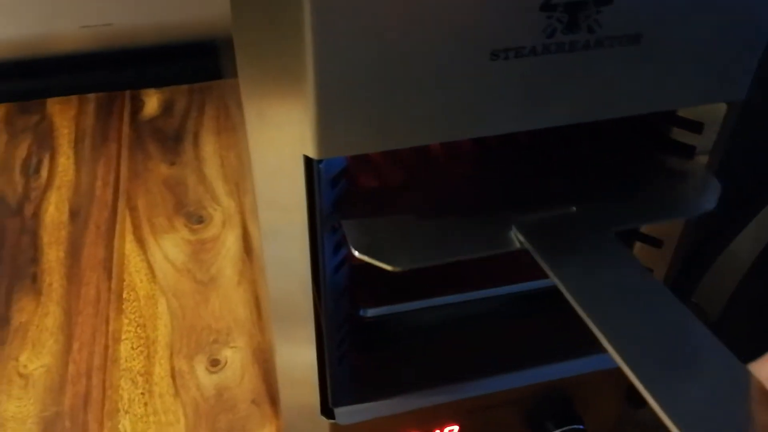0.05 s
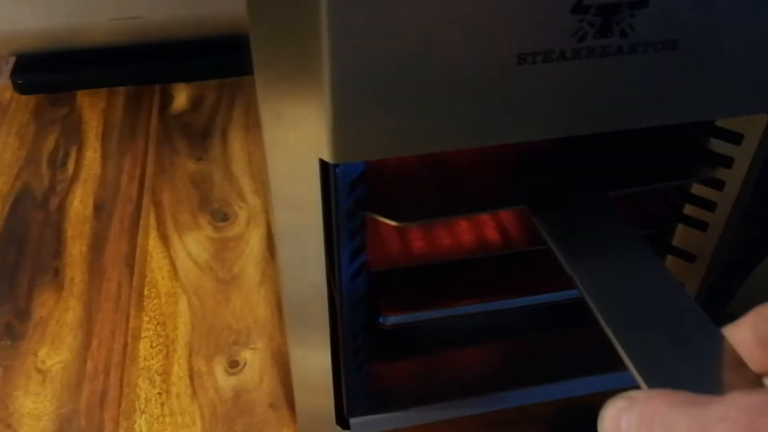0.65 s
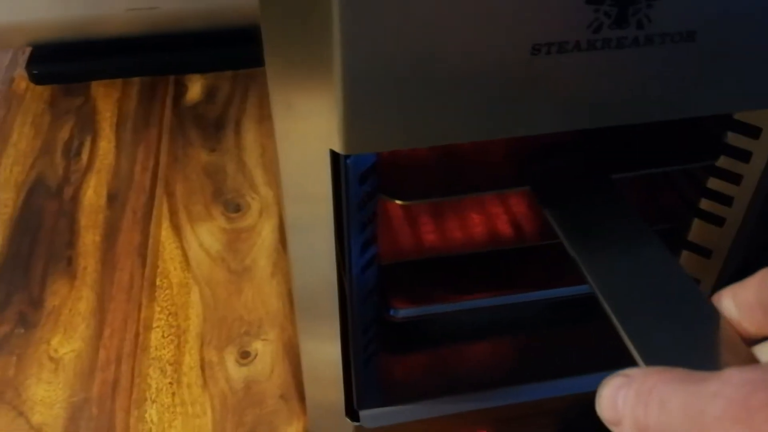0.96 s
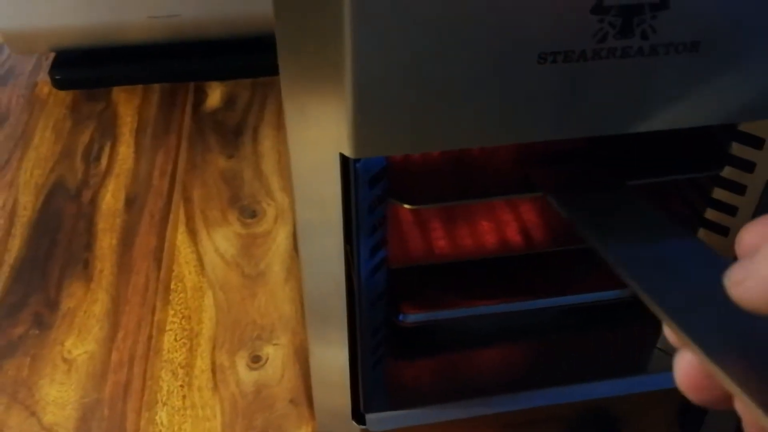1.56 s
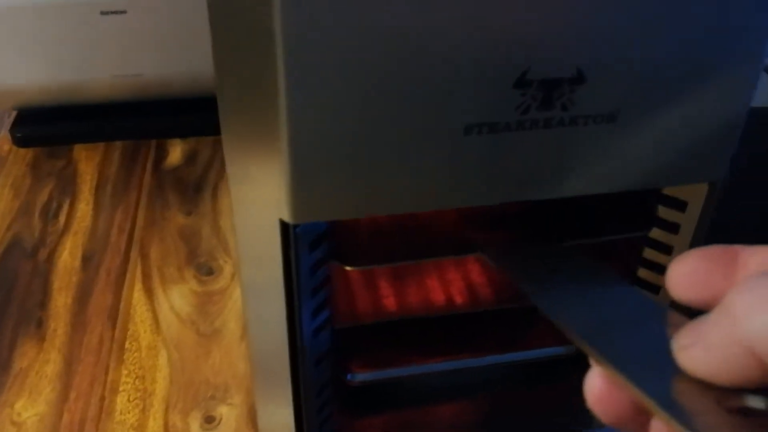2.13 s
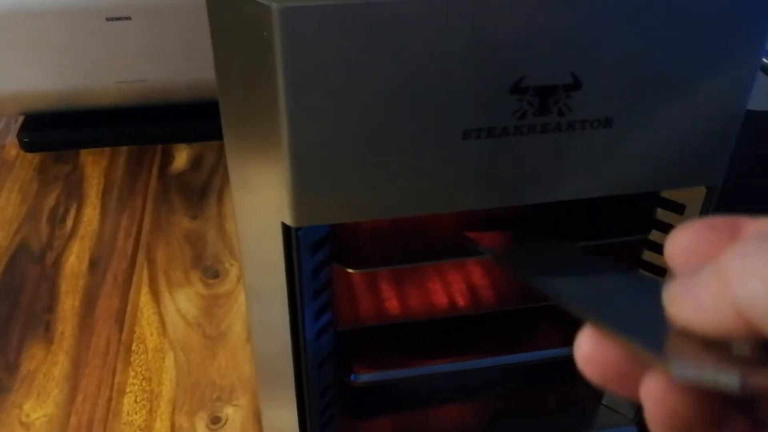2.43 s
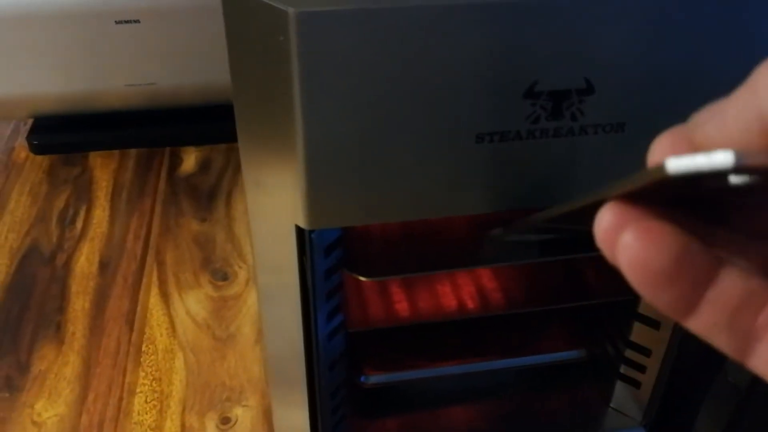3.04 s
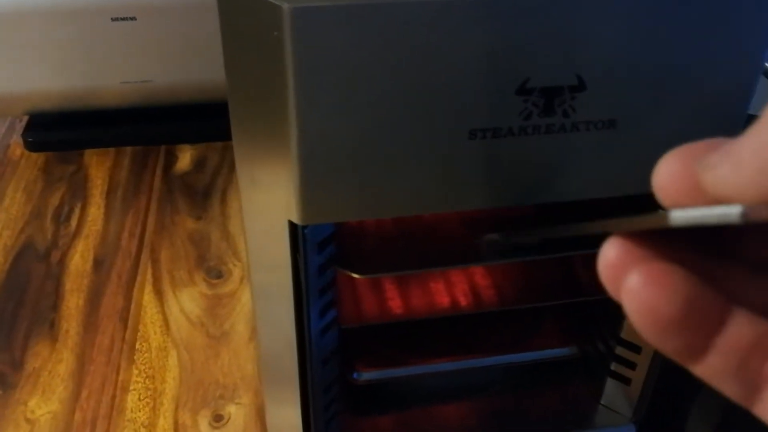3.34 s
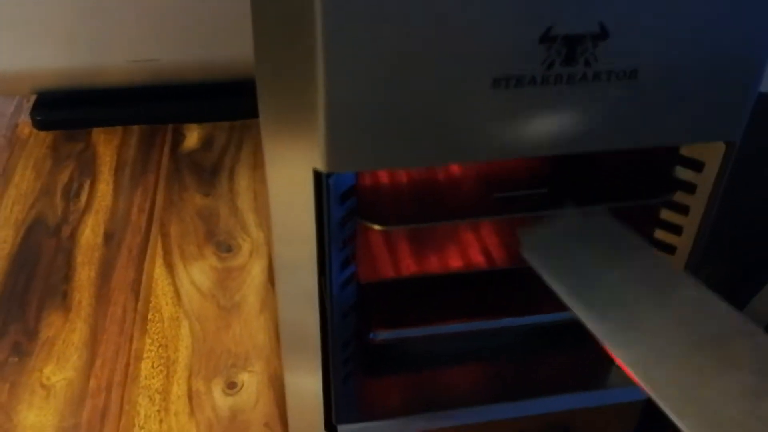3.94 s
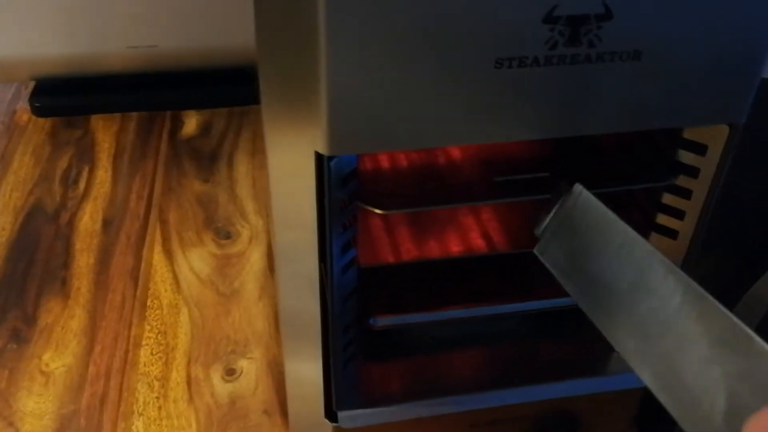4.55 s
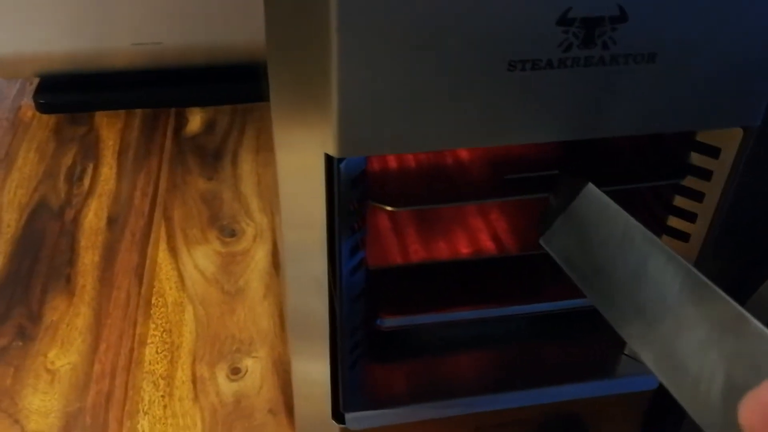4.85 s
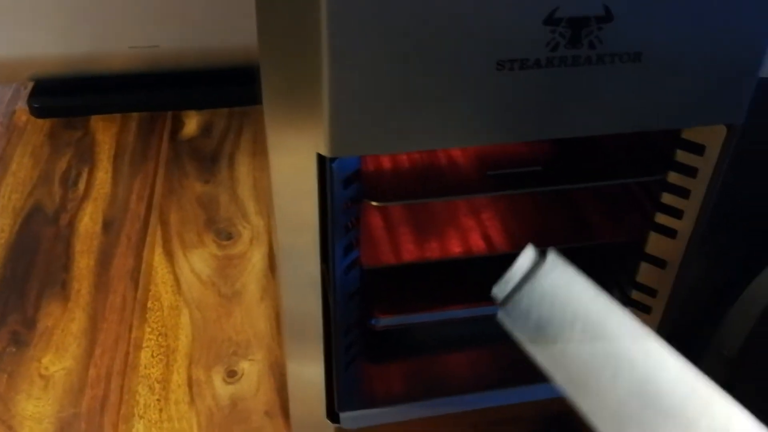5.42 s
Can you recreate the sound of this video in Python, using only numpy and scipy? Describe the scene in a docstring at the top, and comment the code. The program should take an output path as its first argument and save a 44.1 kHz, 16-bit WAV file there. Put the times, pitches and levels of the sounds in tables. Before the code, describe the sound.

Ringing metal clanks from a grill rack, then light steel scrapes and clicks, then more sharp clanks in a quiet kitchen.

```python
"""Small kitchen, electric grill on the counter. A steel rack slides in and clanks against the
sheet-steel housing: each blow gives a crash, ringing rack modes and a hollow boom.
The flat steel handle ticks, scrapes out of the rack in uneven slips and knocks on the grill again.
Faint fan noise and mains hum lie underneath; the room adds a short reverb."""
import sys
import numpy as np
from scipy import signal
from scipy.fft import rfft, irfft, next_fast_len
from scipy.io import wavfile
from scipy.ndimage import map_coordinates

SR = 44100
rng = np.random.default_rng(int(sys.argv[2]) if len(sys.argv) > 2 else 0)


def store_wav(level_fs):
    """Save 16-bit WAV to argv[1]."""
    pcm = np.round(np.clip(np.atleast_2d(level_fs), -1, 1) * 32767)
    wavfile.write(sys.argv[1], SR, pcm.T.astype(np.int16))


N = 250488
T = np.arange(SR) / SR  # time since contact [s]
PING_HZ = 4750  # near the handle's clearest mode, which also squeaks under friction

# handle modes: (frequency [Hz], level [dB], free t60 [s], twist share [0-1])
HANDLE_MODES = [(1584, -4.5, 0.11, 1), (2377, -2, 0.1, 0.17), (3445, 1.5, 0.061, 0.086),
                (4110, -4.5, 0.055, 0.8), (4710, 1, 0.38, 0.24), (5780, -2, 0.11, 0.43),
                (6240, 3, 0.1, 0.18), (7020, -3.5, 0.071, 1), (8030, 0, 0.25, 0.4), (8650, -2.5, 0.37, 1),
                (9900, -7, 0.25, 0.2), (9920, 3, 0.22, 0.95), (11900, 1.5, 0.15, 1),
                (12230, -28, .18, 0.27), (14150, -19, .12, 0.92)]
# room decay: (frequency [Hz], t60 [s])
ROOM_T60 = [(150, 0.66), (700, 0.64), (2000, 0.6), (6000, 0.55), (10000, 0.4), (15000, 0.17)]
# direct sound: (frequency [Hz], L/R correlation [0-1])
DIRECT_CORR = [(200, 1), (1200, 0.88), (2200, 0.64), (4000, 0.0019), (9000, 0.13)]
# diffuse sound: (frequency [Hz], L/R correlation [0-1])
DIFFUSE_CORR = [(150, 1), (400, 0), (1100, 0), (2500, 0.0066), (9000, 0)]


def amp(db):
    """dB to gain."""
    return 10 ** (np.asarray(db) / 20)


def unit(x):
    """Scale to rms 1."""
    return x / np.sqrt(np.mean(x ** 2) + 1e-20)


def along(points, hz):
    """Interpolate (frequency [Hz], value) points on a log axis."""
    f, v = np.transpose(points)
    return np.interp(np.log(hz + 1), np.log(f + 1), v)


def pan(db):
    """Stereo gains for a left-minus-right level."""
    return amp(np.array([[.5], [-.5]]) * db)


def wobble(rate_hz):
    """Smooth random curve with knots at rate_hz."""
    knots = rng.standard_normal(int(N * rate_hz / SR) + 4)
    return map_coordinates(knots, [np.arange(N) * rate_hz / SR])


def filtered(x, response):
    """Apply the gain response(hz) by FFT."""
    n = x.shape[-1]
    m = next_fast_len(n + 8192)
    return irfft(rfft(x, m) * response(np.fft.rfftfreq(m, 1 / SR)), m)[..., :n]


def tilt(hz, db_oct):
    """Spectral slope about 3 kHz: harder contact, more treble."""
    return amp(db_oct * np.log2(np.clip(hz, 800, 16000) / 3000))


def resonances(hz, db, width_hz, valley_db):
    """Body response: a peak at each mode over a flat floor."""
    grid_hz = np.linspace(0, SR / 2, num=4096)
    power = amp(db) ** 2 @ (1 / (1 + ((grid_hz - hz[:, None]) * 2 / width_hz) ** 2))
    return lambda f: np.interp(f, grid_hz, np.sqrt(power + amp(valley_db) ** 2))


def noise(spectrum, corr, size, db_oct=0, body=np.ones_like):
    """Stereo noise, rms 1, with given spectrum, L/R correlation, tilt and body response."""
    def colour(hz):
        angle = np.arccos(np.clip(along(corr, hz), -1, 1)) / 2
        return amp(along(spectrum, hz)) * tilt(hz, db_oct) * body(hz) * [np.cos(angle), np.sin(angle)]
    mid, side = filtered(rng.standard_normal((2, size)), colour)
    return unit(np.array([mid + side, mid - side]))


def rise(attack_s):
    """Exponential onset."""
    return 1 - np.exp(-T / attack_s)


def fade(t60_s, attack_s):
    """Onset and exponential decay."""
    return np.exp(-np.log(1000) * T / t60_s) * rise(attack_s)


def band_decay(x, t60_curve):
    """Decay each band by (frequency [Hz], t60 [s]) points."""
    hz, t, bands = signal.stft(x, SR, nperseg=256)
    decay = np.exp(-np.log(1000) * t / along(t60_curve, hz)[:, None])
    return signal.istft(bands * decay, SR, nperseg=256)[1][:, :SR]


def ring(hz, db, t60_s, scatter_db):
    """Decaying modes, initial rms 1; L/R phase spread grows with frequency."""
    gain = amp(db + scatter_db * rng.standard_normal((2, len(hz))))
    gain /= np.sqrt(np.sum(gain ** 2) / 4)
    phase = 2 * np.pi * rng.random(len(hz)) + hz / 2200 * rng.standard_normal(gain.shape)
    poles = 2j * np.pi * hz - np.log(1000) / t60_s
    return ((gain * np.exp(1j * phase)) @ np.exp(poles[:, None] * T)).imag


def add(track, start_s, sound):
    """Mix in up to 1 s of sound."""
    part = track[:, round(start_s * SR):][:, :SR]
    part += sound[:, :part.shape[1]]


def fan():
    """Moving air plus slightly unsteady motor and mains tones."""
    # air noise: (frequency [Hz], level [dB])
    air_spectrum = [(20, -15), (80, -12.5), (150, -3.5), (260, 0.5), (350, -4.5), (490, -13.5), (660, -5),
                    (880, -9.5), (1100, 1), (1500, -1.5), (2100, -8.5), (4000, -16), (9500, -23.5),
                    (15000, -35.5)]
    # air width: (frequency [Hz], L/R correlation [0-1])
    air_corr = [(60, 0.89), (180, 1), (550, 0.17), (1650, 0.54), (4970, 0.014), (15000, 0.021)]
    # air balance: (frequency [Hz], L-R [dB])
    air_pan = [(60, -1), (180, -1.5), (550, 2), (1650, 2), (4970, -0.5), (15000, 5.5)]
    # mains and motor tones: (frequency [Hz], level [dB])
    tones = [(48.4, -71.5), (96.9, -73), (172.3, -68.5), (296.1, -72), (393.0, -78), (672.9, -73),
             (1044, -70), (1179, -70.5), (1523, -67.5)]
    t = np.arange(N) / SR
    air = filtered(noise(air_spectrum, air_corr, N), lambda hz: pan(along(air_pan, hz)))
    hum = sum(amp(db) * np.sqrt(2) * np.sin(2 * np.pi * hz * t + 0.0027 * hz * wobble(rate_hz=9))
              for hz, db in tones)
    return amp(-55.5 + 0.83 * wobble(rate_hz=4.97)) * air + amp(-1.0) * hum


def kitchen_reverb(x):
    """Diffuse room response: strong early bounces off counter and wall, faint tail."""
    early = 1 + amp(6) * np.exp(-T / 0.061)
    diffuse = noise([(100, -2), (15000, -4)], DIFFUSE_CORR, SR)
    impulse = band_decay(diffuse, ROOM_T60) * rise(0.0031) * early
    return signal.fftconvolve(x, impulse / np.linalg.norm(impulse[0]), axes=1)[:, :N]


def handle_scrape():
    """Uneven steel-on-steel slips drive the handle's modes, widened by contact damping."""
    # slides in the rack: (start [s], length [s], level [dB], tilt [dB/oct], ping boost [dB])
    strokes = [(1.969, 0.067, -63, -7, 9), (2.024, 0.045, -51.5, -6.5, 13), (2.258, 0.035, -70, -2, 12),
               (2.355, 0.05, -68, 3, 2), (3.154, 0.022, -53.5, -8, -8), (3.332, 0.043, -54.5, -2.5, -2),
               (3.377, 0.076, -43.5, 0.3, 6.5), (3.51, 0.05, -46, 2, -6)]
    # friction: (frequency [Hz], level [dB])
    friction = [(500, -19), (1500, 9), (2200, 8.5), (3000, -8.5), (4300, 4.0), (12000, -9.5),
                (15500, -27)]
    hz, mode_db = np.transpose(HANDLE_MODES)[:2]
    is_ping = np.abs(hz - PING_HZ) < 250
    grip_s, release_t60_s = 0.0041, 0.16
    out = np.zeros((2, N))
    for start_s, length_s, db, db_oct, ping_db in strokes:
        body = resonances(hz, mode_db + ping_db * is_ping, width_hz=51, valley_db=-19)
        envelope = rise(grip_s) * np.exp(-np.log(1000) * np.maximum(T - length_s, 0) / release_t60_s)
        add(out, start_s, amp(db) * envelope * noise(friction, DIRECT_CORR, SR, db_oct, body))
    slips = unit(amp(1.5 * wobble(rate_hz=400)))
    return slips * out * pan(0.67)


def handle_taps():
    """The handle hits the rack: a tick, then the strip rings, damped by grip and contact."""
    # contacts: (time [s], level [dB], tilt [dB/oct], ping boost [dB], twist [dB], tick [dB], L-R [dB])
    contacts = [(2.029, -48.5, -1, 12.5, -12, -6, -8.5), (3.152, -55, -8, -11, 3, -11, 15),
                (3.165, -45.5, -12, -14, -14, -15, 7), (3.432, -50.5, 3, 3, 2, -8, 15),
                (3.452, -46, 5, -7, -16, -19, 16), (3.482, -37, 2.5, 4, -12, -2, 2),
                (3.497, -39, 2, -3, 0, -4.5, 13), (4.8015, -34.5, -1, -14, -34, -15, 1),
                (4.813, -51.5, 5.5, -21, -7, 1, 7)]
    # contact noise: (frequency [Hz], level [dB])
    tick_spectrum = [(600, -18), (1500, 4), (3000, -2), (5000, -3), (10000, -6.5), (12200, -11),
                     (15500, -30)]
    hz, mode_db, t60_s, twist_share = np.transpose(HANDLE_MODES)
    is_ping = np.abs(hz - PING_HZ) < 250
    held_t60_s = 0.45 * t60_s
    out = np.zeros((2, N))
    for start_s, db, db_oct, ping_db, twist_db, tick_db, pan_db in contacts:
        # edge blows twist the strip; face blows only bend it
        struck_db = mode_db + twist_db * twist_share + ping_db * is_ping + db_oct * np.log2(hz / hz[0])
        strip = ring(hz, struck_db, held_t60_s, scatter_db=-0.1) * rise(0.00098)
        strip *= amp(max(ping_db, 0) / 2)
        tick = noise(tick_spectrum, DIRECT_CORR, SR, db_oct) * fade(t60_s=0.16, attack_s=0.00064)
        add(out, start_s, amp(db) * pan(pan_db) * (strip + amp(tick_db) * tick))
    return out


def rack_clanks():
    """Blows on rack and housing: crash through the steel's modes, ring, slower boom, room tail."""
    # blows: (time [s], level [dB], tilt [dB/oct], favoured frequency [Hz], boom [dB])
    blows = [(0.081, -40.5, -0.5, 3950, -16.5), (0.727, -53, -2.5, 8000, -18),
             (0.8724, -24.5, 0.1, 1000, -16.5), (0.889, -36, -9.5, 1320, -2), (4.803, -46, -2.5, 1750, -21),
             (4.964, -28, 0.15, 7600, -15), (5.0459, -22, 0.6, 6800, -14.5)]
    # rack and housing modes: (frequency [Hz], level [dB], free t60 [s])
    modes = [(216, 3, 0.51), (394.3, -16, 2.1), (840, -4.5, 0.79), (983, -2, 0.17), (1015.5, -1, 0.24),
             (1274, -4, 0.13), (1334, -1, 0.53), (1552, -0.5, 0.21), (1790, -1, 0.84), (2082, 1.5, 0.22),
             (2600, -2.5, .35), (2860, -2.5, 0.77), (3510, -3, 0.79), (3810, -6, 0.81), (3950, -3, 0.36),
             (4490, -4.5, 0.63), (4860, -2.5, 0.63), (5080, -14, 0.31), (5580, -5, 0.55), (6140, -2, 0.37),
             (6490, 2, 0.13), (6830, -7.5, 1), (7170, -18, .36), (7700, -2, 0.55), (8500, -10, .3),
             (9050, -21, .38), (9700, -2.5, 0.48), (10600, -10, 0.25)]
    # blow, direct: (frequency [Hz], level [dB])
    steel_spectrum = [(150, -24), (550, -11), (950, -4), (1400, -1), (2100, -2.5), (2500, -6.5),
                      (3300, -2.5), (4400, -0.5), (6500, -2), (10000, 0), (12500, -9), (15500, -26)]
    # blow, via the room: (frequency [Hz], level [dB])
    tail_spectrum = [(150, -12), (550, -4), (900, -5.5), (2100, -2), (3200, -3), (4500, -1.5), (6500, -6),
                     (10000, -6.5), (15000, -14)]
    # hollow housing: (frequency [Hz], level [dB])
    boom_spectrum = [(50, -29), (120, -8.5), (205, -1.5), (270, -7), (335, 6.5), (390, -4), (435, -14),
                     (490, -6.5), (560, -11), (800, -5.5), (2000, -47)]
    # grill balance: (frequency [Hz], L-R [dB])
    grill_pan = [(400, -3), (1100, 3.5), (2100, 7.5), (4000, -3), (7000, -6), (12000, 10.5)]
    crash_t60 = [(1000, 0.2), (2000, 0.27), (5000, 0.18), (12000, 0.076)]
    firm_db, firm_t60_share, loss_per_db = -26, 0.55, 0.14
    hz, mode_db, t60_s = np.transpose(modes)
    out = np.zeros((2, N))
    for start_s, db, db_oct, favoured_hz, boom_db in blows:
        # harder blows press the rack into its rails: shorter ring
        t60_share = np.clip(firm_t60_share - loss_per_db * (db - firm_db), .1, 1)
        # the contact point favours one group of modes
        favour_db = 4 * np.exp(-(np.log2(hz / favoured_hz) / 0.14) ** 2)
        struck_db = mode_db + favour_db + rng.standard_normal(len(hz))
        body = resonances(hz, struck_db, width_hz=38, valley_db=-12)
        crash = band_decay(noise(steel_spectrum, DIRECT_CORR, SR, db_oct, body), crash_t60)
        # near-identical bars split each mode into a beating pair
        pairs_hz = np.tile(hz, 2) * (1 + 0.00297 * rng.standard_normal(2 * len(hz)))
        bars = ring(pairs_hz, np.tile(struck_db, 2), np.tile(t60_s, 2) * t60_share, scatter_db=1.5)
        rack = amp(-6.5) * filtered(bars, lambda f: tilt(f, db_oct) * amp(along(steel_spectrum, f)))
        direct = filtered(crash + rack, lambda f: pan(along(grill_pan, f) + 1.5)) * rise(0.00066)
        boom_envelope = fade(t60_s=0.22, attack_s=0.022) + amp(-10) * fade(t60_s=0.96, attack_s=0.07)
        boom = amp(boom_db) * noise(boom_spectrum, DIRECT_CORR, SR) * boom_envelope
        diffuse = noise(tail_spectrum, DIFFUSE_CORR, SR, db_oct, body)
        tail = amp(-7.5) * band_decay(diffuse, ROOM_T60) * rise(0.023)
        add(out, start_s, amp(db) * (direct + boom + tail))
    return out


def scene():
    """Rack, handle with its reverb, and fan."""
    handle = handle_taps() + handle_scrape()
    return rack_clanks() + handle + amp(-8.5) * kitchen_reverb(handle) + fan()


def record(dry):
    """Brick-wall low-pass."""
    return filtered(dry, lambda hz: hz < 15800)


dry = scene()
out = record(dry)
store_wav(out)
```